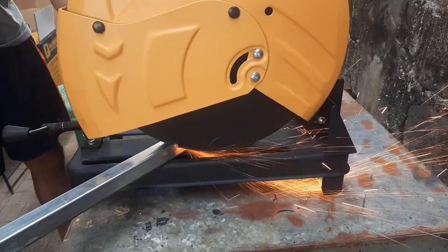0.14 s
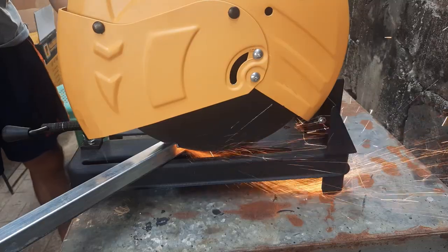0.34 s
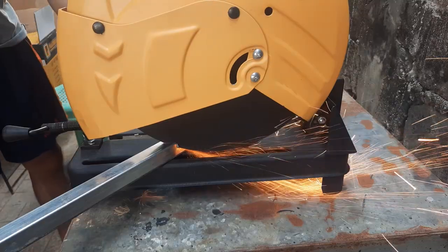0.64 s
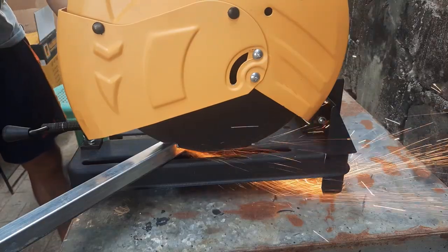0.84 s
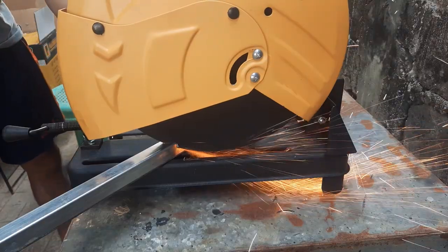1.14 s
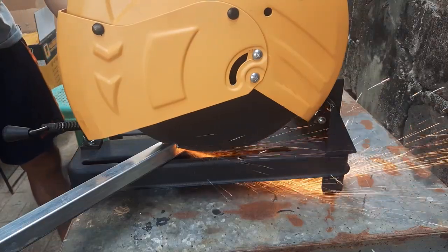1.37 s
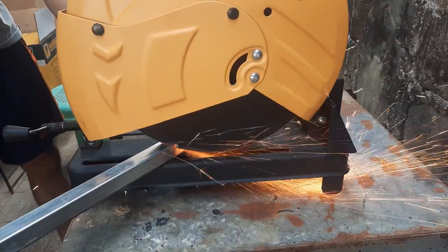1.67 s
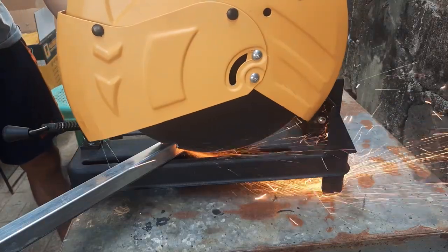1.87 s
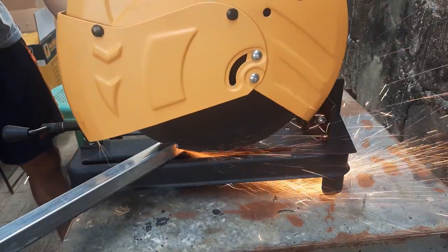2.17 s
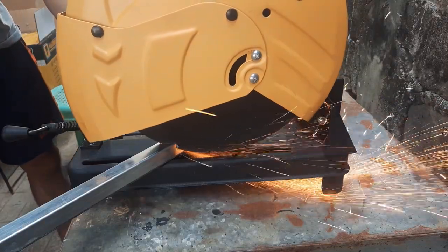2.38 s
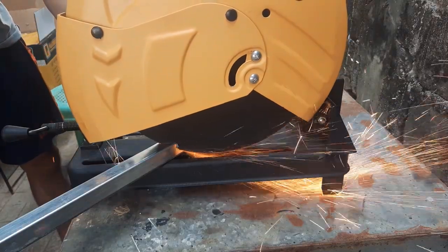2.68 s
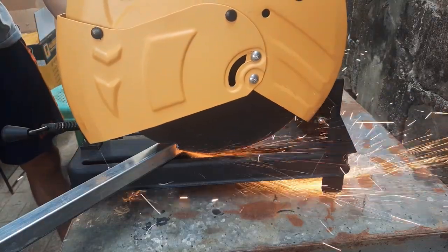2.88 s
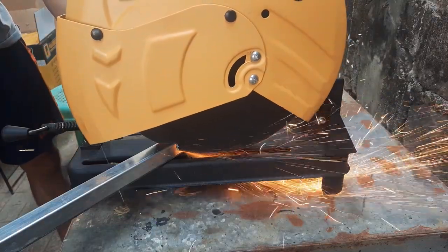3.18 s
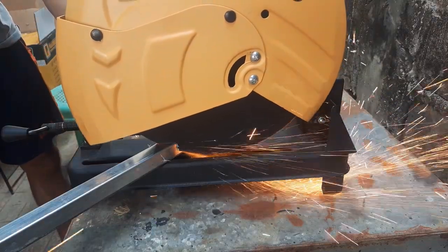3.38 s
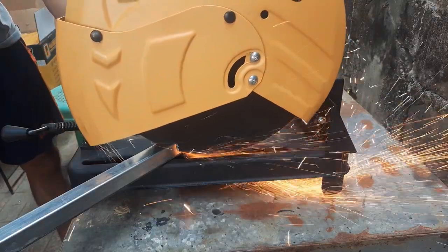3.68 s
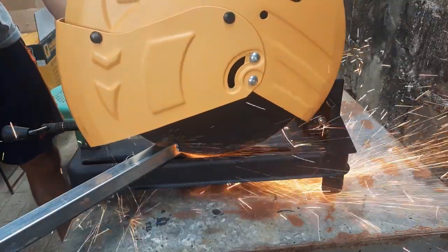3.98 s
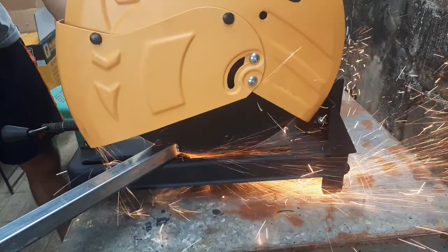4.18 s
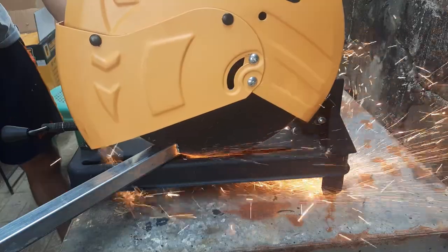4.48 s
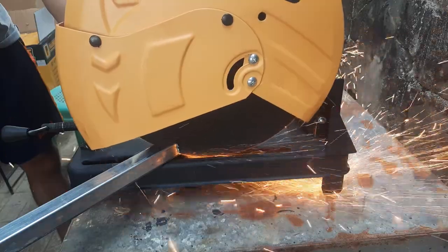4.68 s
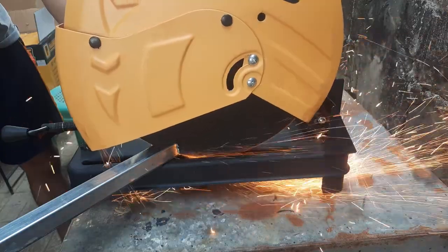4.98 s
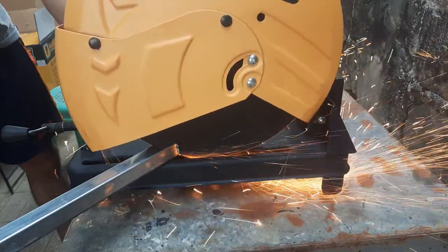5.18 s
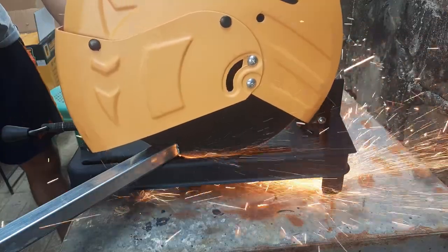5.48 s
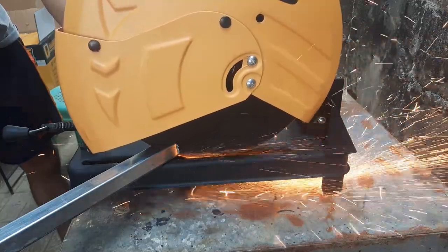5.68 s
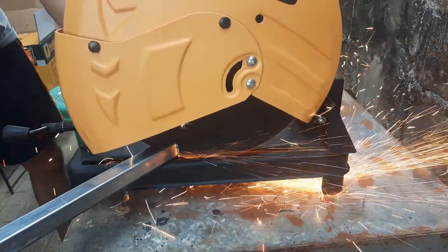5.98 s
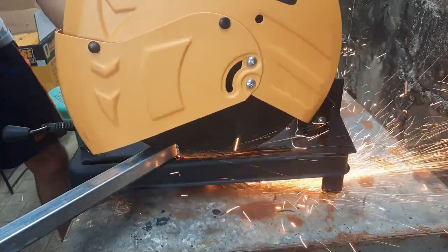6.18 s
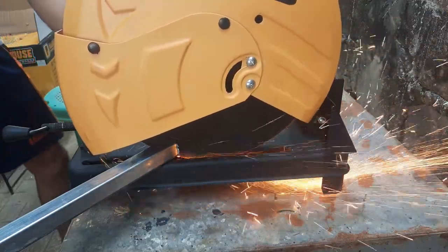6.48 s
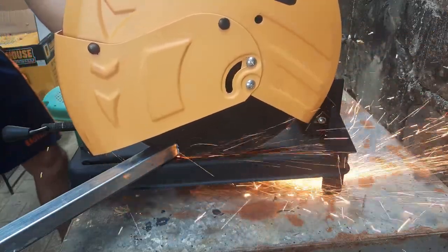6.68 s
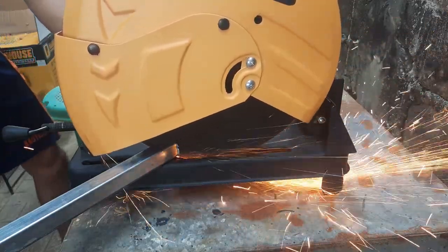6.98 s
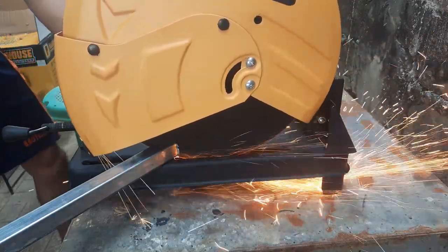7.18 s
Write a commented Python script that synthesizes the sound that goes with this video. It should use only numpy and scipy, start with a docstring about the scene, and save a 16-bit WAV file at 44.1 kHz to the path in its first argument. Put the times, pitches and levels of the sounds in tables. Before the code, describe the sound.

An abrasive cut-off saw grinds through square steel tubing close up, a loud unbroken metallic screech with gritty rasp, hissing sparks and motor hum.

```python
"""An abrasive cut-off saw grinds through square steel tubing, close up in mono.
The same ring of grit is read on every turn of the disc, so the rasp is a dense comb on the sagging shaft speed.
Air noise thickens the roar and spark noise the hiss; the tube wall screeches as sines locked to the disc,
strongest near 4 kHz, and grit-fed resonances squeal in turn. Shaft sines make the motor's hum and whine,
low noise rumbles in the bench, soft low tones burst in, and brief dropouts leave only the strongest partials."""
import sys
import numpy as np
from scipy import signal
from scipy.fft import rfft, irfft
from scipy.io import wavfile
from scipy.ndimage import uniform_filter1d

SR = 44100
rng = np.random.default_rng(int(sys.argv[2]) if len(sys.argv) > 2 else 0)


def unload_wav(signal):
    """Save mono or channel-first audio to the path in sys.argv[1] as 16-bit WAV at rate SR, clipped to [-1, 1]."""
    wavfile.write(
        sys.argv[1],
        SR,
        np.round(np.clip(np.atleast_2d(signal).T, -1, 1) * 32767).astype(np.int16),
    )


N = 323694
TIME = np.arange(N) / SR  # seconds
BINS = np.fft.rfftfreq(N, 1 / SR)  # Hz
EDGE_HZ = 16000  # top of the sound's band


def amp(db):
    """Decibels to gain."""
    return 10 ** (np.asarray(db) / 20)


def unit(x):
    """Scales to rms 1."""
    return x / np.sqrt(np.mean(x ** 2) + 1e-20)


def steadied(x, seconds):
    """Scales to rms 1 over a sliding span, keeping the faster flutter."""
    size = max(int(seconds * SR / 2), 2)
    power = uniform_filter1d(uniform_filter1d(x ** 2, size), size)
    return x / np.sqrt(power + 1e-20)


def curves(rows):
    """One curve in time for each value column."""
    seconds, *columns = np.transpose(rows)
    return [np.interp(TIME, seconds, column) for column in columns]


def colour(points):
    """A spectrum in dB on the frequency bins, drawn through points on a log frequency axis."""
    hz, db = np.transpose(points)
    return np.interp(np.log(BINS + 1), np.log(hz), db)


def band(lo_hz, hi_hz, order=8):
    """Gain of a band with steep edges."""
    low_edge = 1 + (lo_hz / (BINS + 1)) ** (2 * order)
    high_edge = 1 + (BINS / hi_hz) ** (2 * order)
    return (low_edge * high_edge) ** -.5


def drift(rate_hz, size=4096):
    """Slow random motion of rms 1."""
    hz = np.fft.rfftfreq(size, N / SR / size)
    slow = irfft(rfft(rng.standard_normal(size)) / (1 + (hz / rate_hz) ** 4))
    return np.interp(TIME, np.linspace(0, TIME[-1], size), unit(slow))


def resonate(x, hz, width):
    """A steep resonance that follows the curve hz: shift down to zero, low-pass, shift back up."""
    turn = np.exp(2j * np.pi * np.cumsum(hz * np.ones(len(x))) / SR)
    return (turn * signal.lfilter(*signal.butter(2, width / 2, fs=SR), x / turn)).real


def swell(start, end, fade_s):
    """Rise, hold and release; a sound under way at either end of the scene keeps its strength there."""
    rise = np.clip((TIME - start) / fade_s, 0, 1) if start > fade_s / 2 else 1
    fall = np.clip((end - TIME) / fade_s, 0, 1) if end < TIME[-1] - fade_s / 2 else 1
    return rise * fall


# The shaft, sagging under load. Each row: time in seconds, speed in turns per second.
SHAFT_SPEED = [(0, 52.57), (.3, 52.04), (1, 51.22), (1.9, 50.09), (2.2, 49.49), (2.8, 48.94), (3.4, 48.66),
               (3.65, 48.62), (4.2, 48.3), (4.6, 47.77), (5.4, 47.71), (5.8, 47.63), (6.25, 47.79),
               (6.7, 48.29), (7.1, 48.57), (7.34, 48.6)]


def shaft():
    """Speed of the shaft and the turns it has made, the clock for everything locked to the disc."""
    speed = curves(SHAFT_SPEED)[0]
    return speed, np.cumsum(speed) / SR


# How well the grit pattern lasts from turn to turn; low when grains break away.
# Each row: time in seconds, steadiness from 0 to 1.
GRIT_STEADINESS = [(0, 0.41), (.5, 0.61), (1.5, 0.62), (1.9, 0.56), (2.45, 0.74), (2.7, 0.55), (3.2, 0.65),
                   (3.5, 0.9), (4.05, 0.74), (4.5, 0.84), (4.8, 0.856), (6.1, 0.86), (6.55, 0.87),
                   (6.72, 0.43), (6.9, 0.76), (7.34, 0.81)]


def grit_steadiness():
    """How faithfully each turn of the rim repeats the last."""
    return np.clip(curves(GRIT_STEADINESS)[0], 0, .99)


def grit(turns, steady, wear=0.57, loose=1.0, size=4096):
    """Force of the rim on the steel: one ring of grains read again each turn and slowly worn into a new one."""
    rim = rng.standard_normal((int(turns[-1]) + 2, size))
    steady_by_turn = np.interp(np.arange(len(rim)), turns, steady)
    kept = np.clip(1 - wear * (1 - steady_by_turn) ** 1.3, 0, .995)
    for k in range(1, len(rim)):
        rim[k] = kept[k] * rim[k - 1] + np.sqrt(1 - kept[k] ** 2) * rim[k]
    # the contact patch smooths away the finest detail
    track = signal.lfilter(*signal.butter(8, 1 / 6), rim.ravel())
    repeating = unit(np.interp(turns * size, np.arange(len(track)), track))
    # grains and chips that break loose never repeat
    share = np.clip(loose * (1 - steady), 0, 1)
    return np.sqrt(1 - share) * repeating + np.sqrt(share) * rng.standard_normal(N)


def lobes(turns, top=7):
    """The uneven rim bears on the steel in the same rhythm on every turn."""
    return unit(sum(np.cos(2 * np.pi * (k * turns + rng.random())) / np.sqrt(k)
                    for k in range(2, round(top) + 1)))


def ripple(depth_db=3.0, count=700):
    """Countless weak modes and echoes from the bench and wall ripple the spectrum, in dB."""
    knots_hz = np.linspace(0, SR / 2, count)
    return depth_db * np.interp(BINS, knots_hz, np.clip(rng.standard_normal(count), -2, 2))


# Colour of the grinding as the disc enters, then deep in the cut.
# Each row: frequency in Hz, relative spectral level in dB.
ENTERING_COLOUR = [(60, -36), (200, -10), (330, -9), (450, -0.5), (680, -3), (1050, -5.5), (1450, -7),
                   (1900, -7.5), (3000, -0.5), (4500, 5.5), (5500, 1), (8500, 6), (10700, -0.5),
                   (12800, -11), (16000, -13.5)]
DEEP_COLOUR = [(60, -48), (200, -20), (330, -12), (450, -3), (650, -5), (1000, -7.5), (1400, -6),
               (1900, -8.5), (3000, -3), (4500, 0.5), (6200, -2.5), (8400, 0.5), (10000, -4.5),
               (12800, -17), (16000, -18.5)]
# Lasting resonances of tube, disc and guard.
# Each row: frequency in Hz, width in Hz, relative height in dB before the ringing factor.
BODY_RESONANCES = [(1330, 110, 4.5), (1453, 90, 5.2), (1700, 70, 3), (2239, 90, 2.2), (2480, 70, 3),
                   (2692, 90, 2.7), (2961, 90, 3.5), (3215, 70, 4.5), (3338, 50, 3), (3822, 49, 3.2),
                   (4727, 59, 4.6), (4931, 50, 3.2), (5792, 61, 2.5), (5900, 79, 7.2), (6126, 90, 6.0),
                   (6525, 90, 5.5), (6718, 52, 4.0), (7009, 90, 4.8), (7343, 90, 5.3), (7773, 90, 4.8),
                   (8040, 80, 4), (8300, 90, 4), (9020, 120, 5.5), (9646, 80, 3.5), (10220, 130, 5.5),
                   (10580, 90, 3.5), (10874, 80, 4.9), (11220, 90, 5), (11779, 120, 5.7), (12317, 90, 3.4)]
# How hard the hand feeds the disc into the steel. Each row: time in seconds, feed in dB.
HAND_FEED = [(0, 0), (2.1, -0.5), (2.6, -0.66), (3.7, .5), (5, -0.7), (5.8, -0.3), (6.4, -0.5), (7.34, 0)]
# Lift of the rasp's shrill band, 5 to 7.1 kHz. Each row: time in seconds, lift in dB.
SHRILL_LIFT = [(0, -1.5), (1.5, 0), (2.2, 1.5), (2.9, 0.7), (3.6, -1), (4.3, -.5), (4.7, -2), (5.2, 0),
               (5.65, 0), (6.1, -0.5), (6.5, 1), (6.82, 2), (7.05, 0.5), (7.34, 1.5)]


def grinding(force, depth, roar_db=-24, rasp_db=-13.0, hiss_db=-22.0, roar_feed=2.05, deep_roar_db=0.8,
             deep_hiss_db=-1.1, air=0.68, low_air=0.95, sparks=0.42, ringing=0.56):
    """The force shakes tube, disc and guard; rushing air adds to the roar, the spark stream to the hiss."""
    body_db = ringing * sum(db / (1 + (2 * (BINS - hz) / width) ** 2) for hz, width, db in BODY_RESONANCES)
    # the weak modes shift as the slot opens
    early = amp(colour(ENTERING_COLOUR) + body_db + ripple())
    late = amp(colour(DEEP_COLOUR) + body_db + ripple())

    def radiate(spectrum):
        """One band of the sound, whose colour shifts with the depth of the cut."""
        entering, deep = irfft(spectrum * early, N), irfft(spectrum * late, N)
        return steadied((1 - depth) * entering + depth * deep, 0.51)

    feed = curves(HAND_FEED)[0]
    grains, rush = rfft(force), rfft(rng.standard_normal(N))
    # the thin disc radiates little bass: down there the air alone is heard
    rushing_air = rush * (air * band(703, 2250) + low_air * band(60, 763, order=4))
    roar = radiate(grains * band(1070, 2267, order=7) + rushing_air)
    roar *= amp(roar_db + roar_feed * feed + deep_roar_db * depth)
    rasp = radiate(grains * band(2530, 9400, order=12)) * amp(rasp_db + feed)
    hiss = radiate((grains + sparks * rush) * band(10470, 21000, order=12))
    hiss *= amp(hiss_db + feed + deep_hiss_db * depth)
    shrill = irfft(rfft(rasp) * band(5000, 7100), N) * (amp(curves(SHRILL_LIFT)[0]) - 1)
    return roar + rasp + shrill + hiss


# Squeals of tube and disc. Each row: start in seconds, end in seconds, starting pitch in Hz,
# width in Hz before the spread, level in dB before the common trim.
SQUEAL_NOTES = [(0, 0.89, 4300, 80, -22), (.05, 2.2, 8500, 221, -21.5), (.1, 2.4, 8500, 200, -25),
                (0, 2.3, 9200, 180, -26), (0, 1.7, 2740, 60, -34), (.4, 1.8, 7860, 128, -31),
                (0.401, 1.5, 5110, 260, -25), (1.2, 2.5, 3380, 80, -34), (.9, 1.9, 4330, 161, -23.5),
                (1.3, 1.82, 2280, 51.3, -26.5), (1.55, 2.2, 10200, 390, -20), (1.55, 2.7, 3880, 90, -28),
                (1.5, 2.3, 2945, 60.3, -34), (1.5, 3.2, 6140, 89.8, -29), (2.05, 3.3, 8650, 307, -22),
                (2.099, 3.2, 7340, 217, -18.5), (2.6, 2.93, 7900, 298, -15), (3, 6.5, 2850, 50, -36),
                (2.6, 4.7, 1440, 200, -31.5), (3.1, 4.1, 2640, 262, -27), (3.55, 4.6, 4570, 142, -24),
                (4, 4.27, 9130, 225, -12.5), (4.2, 6.1, 8530, 202, -22.5), (4.3, 6.2, 7970, 200, -17.5),
                (4.4, 6.1, 4480, 109, -22), (5.4, 8.2, 6720, 603, -18.5), (5.6, 6.2, 2300, 50.3, -26.5),
                (6.2, 6.4, 4660, 90.7, -21), (6.2, 7.1, 5900, 160, -23.5), (6.6, 7.34, 8260, 500, -16.5),
                (6.85, 7.34, 2230, 50, -27), (0, 2.06, 4130, 160, -26.5), (6.5, 7.34, 4040, 160, -18.5),
                (6.45, 7.1, 4650, 160, -21), (6.6, 7.34, 3230, 80, -25)]


def squeals(force, turns, speed, fade_s=0.147, level_db=-4.0, throb=0.49, spread=1.1):
    """Squeals swell and fade as the contact moves round the tube; pitch follows the shaft.
    Each is fed most at one angle of the disc."""
    out = np.zeros(N)
    for (start, end, hz, width, db), angle in zip(SQUEAL_NOTES, rng.random(len(SQUEAL_NOTES))):
        envelope = swell(start, end, fade_s)
        on = envelope > 0
        ring = resonate(force[on], hz * speed[on] / speed[on][0], width * spread)
        feeding = 1 + throb * np.cos(2 * np.pi * (turns[on] + angle / 2))
        out[on] += amp(db + level_db) * steadied(ring * feeding, 0.081) * envelope[on]
    return out


# Screeches, where the wall's vibration locks to the disc. Each row: start in seconds, loudest moment
# in seconds, end in seconds, cycles per turn, peak level in dB before the common trim and waver.
SCREECH_NOTES = [(-0.12, 0.58, 0.98, 102, -30.0), (-0.12, 0.98, 1.1, 96, -30.3),
                 (-0.12, 0.98, 2.08, 57, -31.8), (0.04, 0.26, 0.38, 77, -25.8),
                 (0.06, 0.18, 0.3, 82, -25.8), (0.06, 0.18, 0.3, 113, -28.8), (0.06, 0.18, 0.88, 83, -25.8),
                 (0.2, 0.42, 0.64, 52, -28.1), (0.34, 0.74, 0.86, 84, -28.1),
                 (0.44, 1.54, 1.94, 115, -31.4), (0.54, 0.66, 1.36, 119, -30.3),
                 (0.58, 1.15, 1.45, 65, -28.5), (0.7, 0.82, 1.52, 79, -27.7),
                 (0.92, 1.14, 1.84, 103, -27.9), (0.98, 1.38, 1.78, 85, -28.2),
                 (1.02, 1.14, 1.36, 98, -26.6), (1.06, 1.46, 1.86, 82, -25.8),
                 (1.1, 1.22, 1.92, 150, -28.3), (1.3, 1.7, 1.82, 66, -28.0), (1.48, 1.7, 1.92, 122, -28.3),
                 (1.5, 1.62, 1.84, 117, -29.7), (1.58, 1.7, 1.82, 86, -26.2), (1.96, 2.18, 2.4, 77, -23.5),
                 (1.98, 2.1, 2.22, 67, -26.4), (2.04, 2.26, 2.66, 84, -18.8), (2.06, 2.18, 2.3, 119, -24.0),
                 (2.06, 2.18, 2.58, 132, -25.5), (2.12, 2.34, 2.56, 124, -27.6),
                 (2.12, 3.22, 3.34, 100, -27.9), (2.28, 2.5, 2.62, 149, -22.3),
                 (2.36, 3.46, 4.56, 27, -33.5), (2.44, 3.54, 4.64, 65, -26.9), (2.58, 2.98, 3.1, 82, -27.3),
                 (2.62, 2.74, 2.86, 133, -25.2), (2.74, 3.14, 3.36, 83, -22.1),
                 (2.76, 3.86, 4.96, 66, -25.4), (3.1, 3.22, 3.62, 85, -21.0),
                 (3.14, 3.54, 3.76, 134, -27.2), (3.22, 3.62, 3.74, 144, -27.1), (3.3, 3.7, 4.4, 83, -28.1),
                 (3.32, 4.42, 5.52, 94, -28.7), (3.34, 3.46, 3.68, 84, -20.6), (3.4, 3.62, 3.74, 85, -25.4),
                 (3.5, 3.62, 3.74, 66, -25.6), (3.62, 4.02, 4.24, 59, -27.5), (3.9, 4.02, 5.12, 92, -27.9),
                 (4.1, 4.5, 4.62, 51, -30.0), (4.2, 4.42, 4.54, 66, -23.4), (4.48, 4.76, 5.15, 84, -24.0),
                 (4.6, 5.3, 5.42, 84, -18.9), (4.6, 5.3, 5.42, 85, -26.4), (4.84, 5.94, 7.04, 99, -26.0),
                 (5.24, 5.94, 6.34, 85, -17.6), (5.32, 6.02, 6.24, 141, -26.2),
                 (5.82, 5.94, 6.64, 68, -22.3), (5.88, 6.1, 6.22, 124, -24.1), (5.88, 6.58, 6.7, 84, -14.7),
                 (6.06, 6.18, 6.3, 84, -19.5), (6.12, 6.34, 6.74, 67, -23.4), (6.22, 6.34, 6.56, 46, -29.3),
                 (6.28, 6.98, 7.2, 95, -27.4), (6.3, 6.42, 6.64, 123, -26.0), (6.36, 7.06, 7.46, 83, -19.7),
                 (6.38, 6.5, 7.2, 85, -23.5), (6.46, 6.58, 6.7, 83, -25.0), (6.54, 6.66, 7.36, 84, -22.9),
                 (6.6, 6.82, 7.04, 122, -24.4), (6.7, 6.82, 6.94, 139, -22.1), (6.78, 6.9, 7.02, 97, -20.5),
                 (6.78, 6.9, 7.3, 98, -27.5), (6.82, 7.22, 7.44, 143, -22.8), (6.92, 7.14, 7.54, 45, -29.0),
                 (6.92, 7.14, 7.54, 138, -25.1), (7.02, 7.14, 7.54, 85, -15.7),
                 (7.1, 7.22, 7.44, 66, -23.2)]


def screech(turns, level_db=-.2, throb=0.092, jitter=0.03, waver_db=0.57, fullness=1.24):
    """The wall swings a whole number of times per turn, a near-pure tone that builds up and dies away.
    Neighbouring tones beat once a turn."""
    out = np.zeros(N)
    unrest = jitter * drift(25)  # in cycles
    for cycles in sorted({row[3] for row in SCREECH_NOTES}):
        power = np.zeros(N)
        for start, loudest, end, _, db in (row for row in SCREECH_NOTES if row[3] == cycles):
            on = (TIME > start) & (TIME < end)
            ramp = np.interp(TIME[on], [start, loudest, end], [0, 1, 0])
            power[on] += amp(db) ** 2 * np.sin(np.pi / 2 * ramp) ** fullness
        on = power > 0
        tone = np.sin(2 * np.pi * (cycles * turns[on] + rng.random() + unrest[on]))
        out[on] += np.sqrt(2 * power[on]) * tone * amp(level_db + waver_db * drift(14)[on])
    return out * (1 + throb * np.cos(2 * np.pi * turns))


# Motor and shaft tones, each changing level as the shaft slows past its own speed.
# Each row: multiple of the shaft speed, level running fast in dB, level under load in dB,
# changeover in turns per second. Both levels waver.
MOTOR_TONES = [(1, -59, -55, 48.2), (2, -43.5, -50.5, 50.2), (3, -53, -45, 48.5), (4, -53, -47.5, 48.9),
               (5, -53, -42, 49.7), (6, -56, -48.5, 48.9), (8, -51, -39.5, 49), (9, -43, -37, 48.8),
               (10, -42, -35.5, 48.5), (11, -45.5, -41.5, 48.9), (13, -57, -45, 48.8)]


def motor(turns, speed, changeover=0.074, waver_db=2.5, jitter=0.04):
    """Shaft harmonics, most of which grow as the load drags the speed down."""
    hum = np.zeros(N)
    for multiple, fast_db, loaded_db, change_speed in MOTOR_TONES:
        load = (1 + np.tanh((change_speed - speed) / changeover)) / 2
        level = fast_db + (loaded_db - fast_db) * load + waver_db * drift(2.7)
        hum += amp(level) * np.sin(2 * np.pi * (round(multiple) * turns + rng.random() + jitter * drift(7.3)))
    return np.sqrt(2) * hum  # levels are rms


# The bench's rumble. Each row: time in seconds, level in dB before the trim.
BENCH_RUMBLE = [(0.0, -28.5), (0.57, -39.5), (1.59, -37.5), (1.86, -42.5), (5.66, -43.5), (6.48, -50.5),
                (6.85, -41), (7.34, -38)]


def bench(level_db=-2):
    """The saw's base shakes the sheet-metal bench top, a low band of noise."""
    shake = irfft(rfft(rng.standard_normal(N)) * band(99, 144, order=4), N)
    return unit(shake) * amp(curves(BENCH_RUMBLE)[0] + level_db)


# The motor's whine. Each row: time in seconds, level in dB before the waver.
WHINE_LEVEL = [(0, -23.5), (.33, -31), (.55, -27.5), (.8, -29.5), (1.3, -26.5), (1.8, -29.5), (2.05, -37.5),
               (2.7, -39), (3.6, -35), (4.45, -33.5), (5.6, -39), (6.3, -33), (6.55, -31), (6.9, -37.5),
               (7.34, -43)]


def whine(turns, level_db=0, waver_db=1.0, jitter=0.036, order=16):
    """The motor's whine, a sine 16 times a turn: strongest at first, mostly fainter deep in the cut."""
    level = curves(WHINE_LEVEL)[0] + level_db + waver_db * drift(36)
    return amp(level) * unit(np.sin(2 * np.pi * (order * turns + jitter * drift(40))))


# The disc bounces, and one band of the sound pulses once a turn. Each row: start in seconds,
# end in seconds, low edge in Hz, high edge in Hz, depth of the pulse (no unit).
CHATTER_SPELLS = [(.1, .95, 2500, 3400, 0.2), (.45, 0.851, 4000, 4680, 0.51),
                  (0.918, 1.5, 2550, 3530, 0.41), (1.2, 1.55, 4550, 5200, 0.28),
                  (1.402, 1.902, 7300, 9200, 0.28), (2.1, 2.8, 2900, 3500, 0.26),
                  (3.2, 3.7, 6550, 7500, .35), (3.25, 3.7, 3800, 4300, 0.21), (3.5, 4.45, 2950, 3450, 0.28),
                  (4.051, 4.345, 5100, 7400, 0.29), (4.65, 5.203, 4900, 5800, 0.31),
                  (6.15, 6.6, 3000, 3700, 0.3)]


def chatter(sound, turns, fade_s=.12, scatter=0.22):
    """The bouncing disc gathers a band into one pulse per turn, its power evened out over each spell."""
    out, spectrum = sound.copy(), rfft(sound)
    for (start, end, lo_hz, hi_hz, depth), angle in zip(CHATTER_SPELLS, rng.random(len(CHATTER_SPELLS))):
        envelope = swell(start, end, fade_s)
        on = envelope > 0
        pulse = unit(np.exp(depth * np.cos(2 * np.pi * (turns[on] + scatter * angle))))
        out[on] += irfft(spectrum * band(lo_hz, hi_hz), N)[on] * (pulse - 1) * envelope[on]
    return out


# Brief dropouts, when the noise drops out and the strongest partials hold on. Each row: centre in seconds,
# length in seconds, number of partials left, tilt of their roar in dB, tilt of their hiss in dB.
DROPOUT_MOMENTS = [(.878, .023, 48, -8, -2), (1.175, .018, 48, -3, 0), (1.43, .022, 44, -4, -2),
                   (1.64, .02, 42, 0, -3), (1.685, .023, 28, -2, -4), (1.735, .019, 42, -1, -2),
                   (1.85, .021, 44, -4, -1), (2.012, .02, 44, -1, -6), (2.06, .018, 44, -1, -7),
                   (2.13, .019, 42, 0, -9), (3.195, .019, 44, 0, -5), (3.985, .019, 44, 0, -12),
                   (4.5, .019, 42, -1, -6), (4.55, .019, 40, 0, -6), (5.8, .019, 46, 0, -12),
                   (6.762, .042, 44, -1, -14), (7.19, .022, 50, -6, -2)]


def dropout(sound, ring_db=0, size=8192):
    """For a moment the noise drops out and the partials that stand out most hold on as a steady chord."""
    out, hz = sound.copy(), np.fft.rfftfreq(size, 1 / SR)
    t = (np.arange(size) - size // 2) / SR
    window = np.exp(-(t / .008) ** 2)
    for centre, length, count, roar_db, hiss_db in DROPOUT_MOMENTS:
        at = round(centre * SR) - size // 2
        source, part = sound[at:at + size], out[at:at + size]
        spectrum = rfft(np.fft.ifftshift(source * window))
        level = np.log(abs(spectrum) + 1e-9)
        peaks = signal.find_peaks(level)[0]
        peaks = peaks[(hz[peaks] > 350) & (hz[peaks] < EDGE_HZ)]
        # rank the peaks by how far they rise above their surroundings
        standing = level - .8 * uniform_filter1d(level, size=500)
        kept = peaks[np.argsort(-standing[peaks])[:count]]
        tilt_db = np.interp(hz[kept], [850, 1000, 2200, 2600, 10000, 11000],
                            [0, roar_db, roar_db, 0, 0, hiss_db])
        partials = spectrum[kept] * amp(tilt_db) * np.exp(2j * np.pi * t[:, None] * hz[kept])
        chord = unit(partials.real.sum(1))
        # longer dropouts are deeper
        gap = min(.6 + length / .075, .97) * np.exp(-abs(2 * t / length) ** 2.5)
        part[:] = part * (1 - gap) + chord * np.std(source) * amp(ring_db) * np.sqrt(gap)
    return out


# Short soft-edged bursts of a low tone near 500 Hz.
# Each row: centre in seconds, pitch in Hz, length in seconds, peak level in dB.
LOW_BURSTS = [(1.18, 570, 0.063, -27), (2.019, 450, 0.024, -19.5), (4.487, 440, 0.1, -26),
              (6.672, 470, 0.011, -18), (6.74, 490, 0.0085, -12.5), (7.186, 480, 0.017, -21)]


def low_bursts():
    """Each burst is one low sine under a bell-shaped envelope."""
    out = np.zeros(N)
    for centre, hz, length, db in LOW_BURSTS:
        envelope = np.exp(-(2 * (TIME - centre) / length) ** 2)
        out += amp(db) * envelope * np.sin(2 * np.pi * (hz * TIME + rng.random()))
    return out


def scene(wobble=0.05, uneven=.05, flutter=0.046, lock=0.45):
    """One shaft drives the cut; the disc's run-out presses harder once a turn, and the hand's feed flutters."""
    speed, turns = shaft()
    depth = np.interp(TIME, [1.6, 3.4], [0, 1])  # 0 entering, 1 deep in the cut
    pressure = 1 + wobble * np.cos(2 * np.pi * turns) + uneven * lobes(turns) + flutter * drift(31)
    steady = grit_steadiness()
    force = grit(turns, steady) * pressure
    # squeals feed on the rim's high spots, which outlast the fine grit
    high_spots = grit(turns, np.clip(steady + lock * (1 - steady), 0, .99)) * pressure
    steel = grinding(force, depth) + squeals(high_spots, turns, speed) + screech(turns)
    steel = chatter(steel, turns)
    saw = steel + motor(turns, speed) + bench() + whine(turns)
    sound = dropout(saw) + low_bursts()
    return np.array([sound, sound])


def record(dry, ceiling=0.73):
    """Peaks beyond the ceiling clip; then a steep low-pass limits the band."""
    clipped = np.clip(dry, -ceiling, ceiling)
    lowpass = signal.firwin(511, EDGE_HZ, window=("kaiser", 9), fs=SR)
    return signal.oaconvolve(clipped, lowpass[None], "same")


dry = scene()
out = record(dry)
unload_wav(out)
```